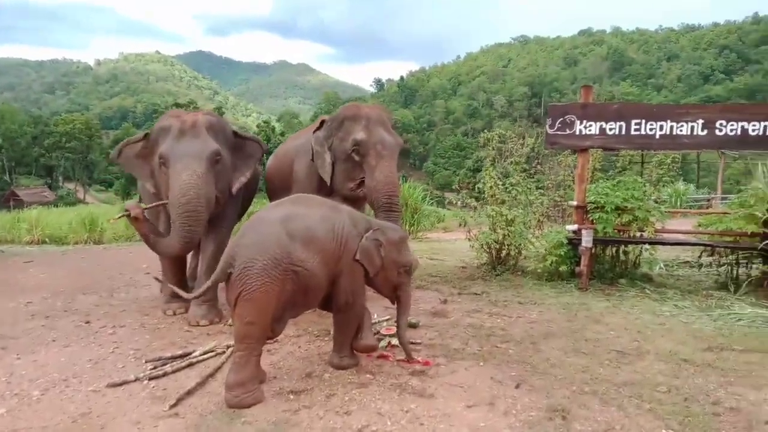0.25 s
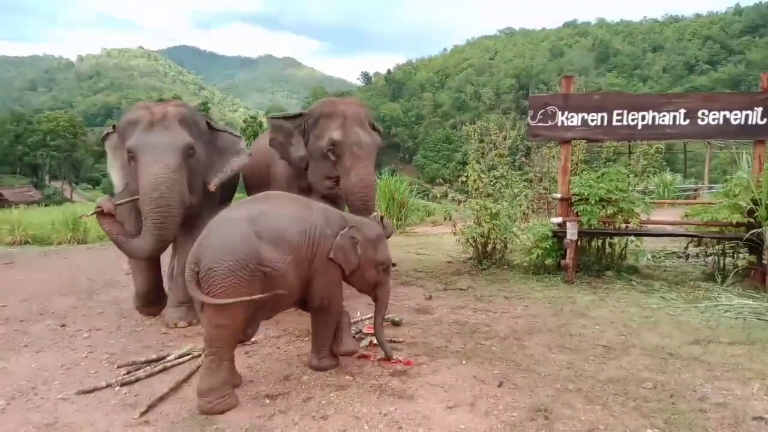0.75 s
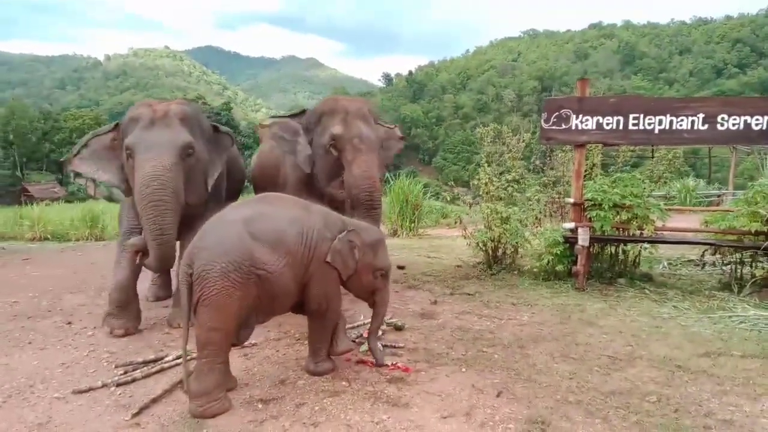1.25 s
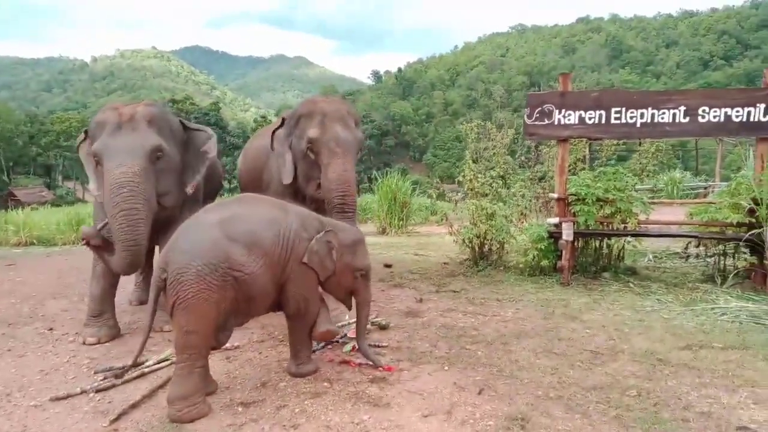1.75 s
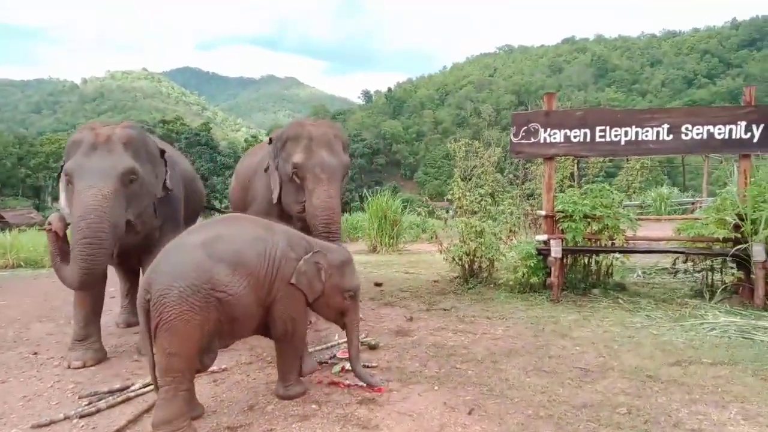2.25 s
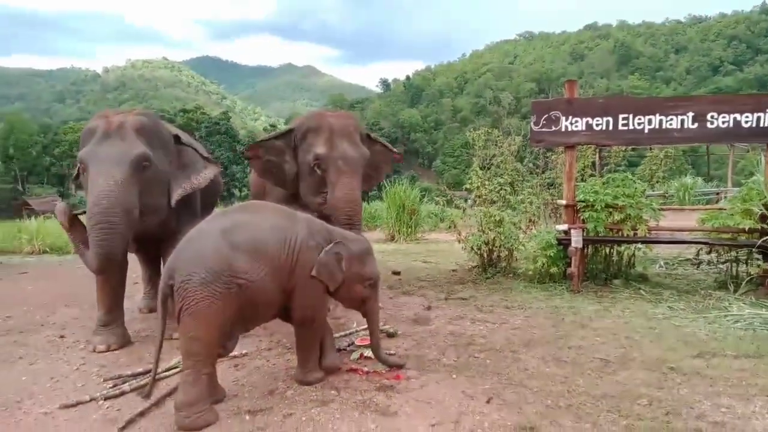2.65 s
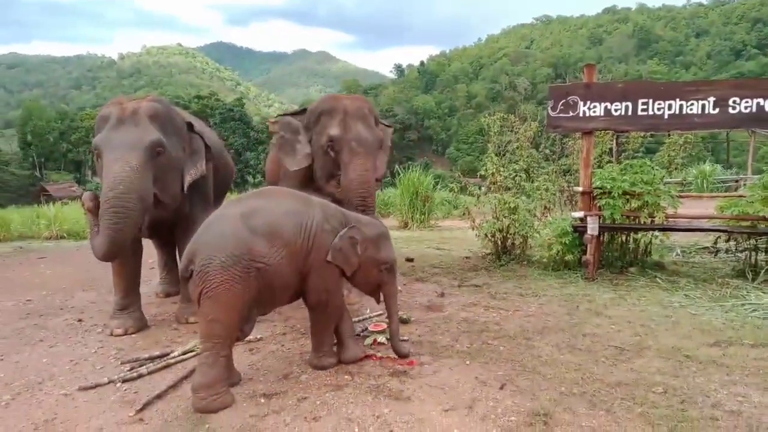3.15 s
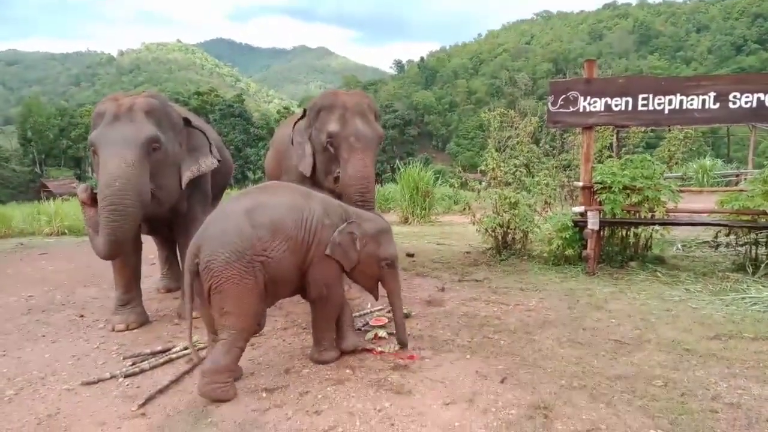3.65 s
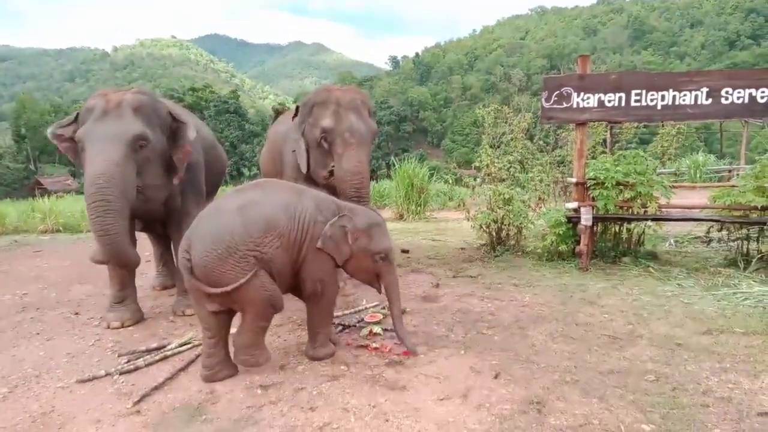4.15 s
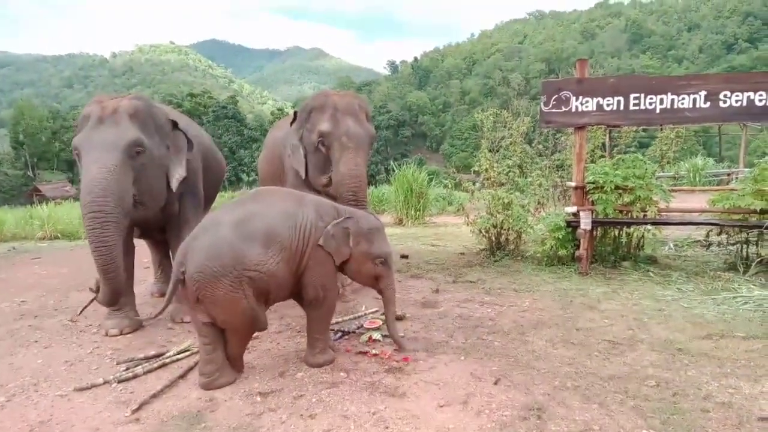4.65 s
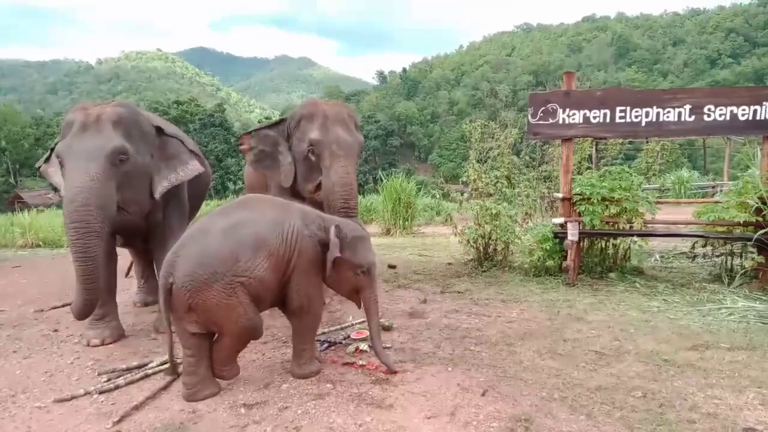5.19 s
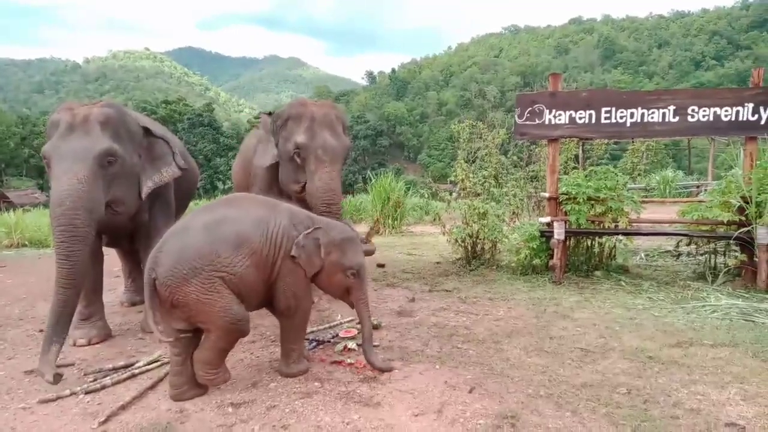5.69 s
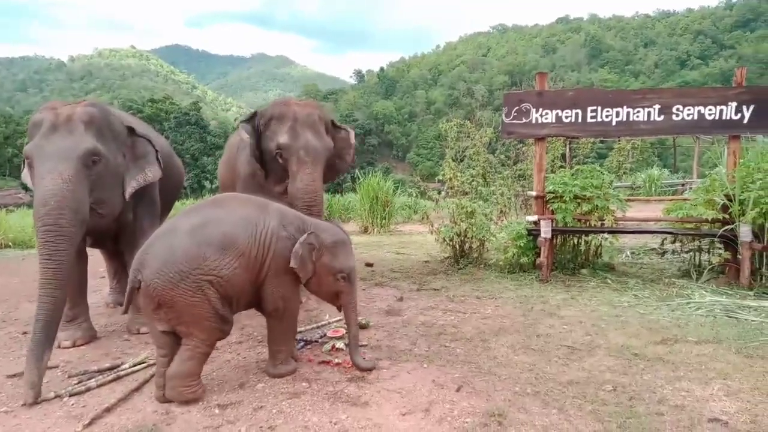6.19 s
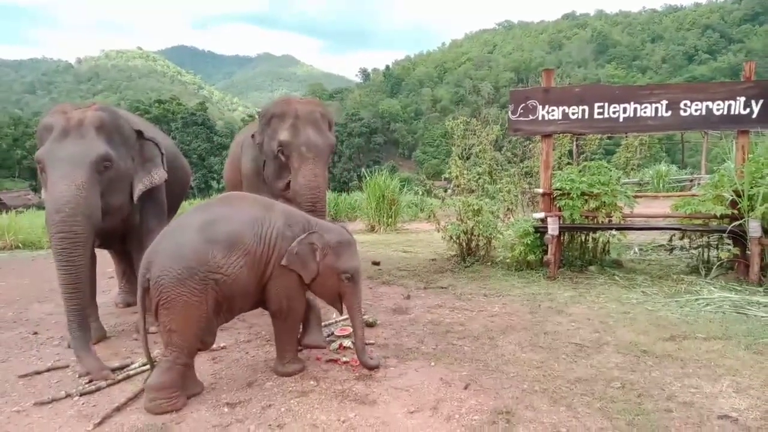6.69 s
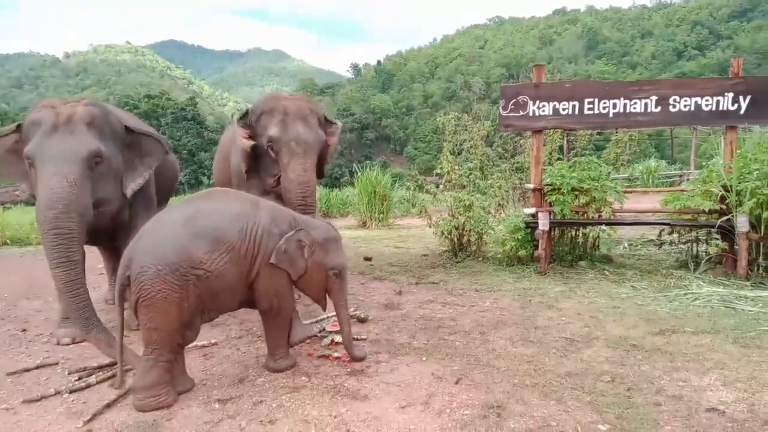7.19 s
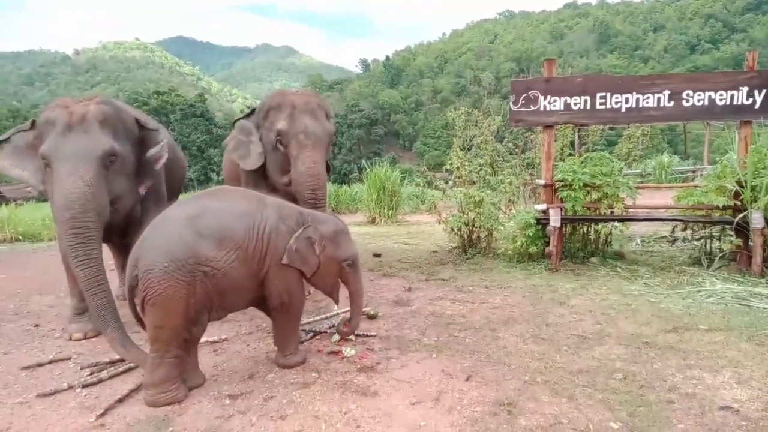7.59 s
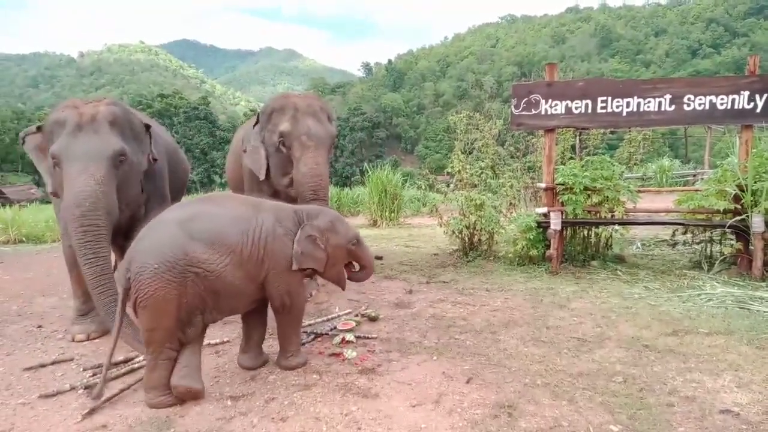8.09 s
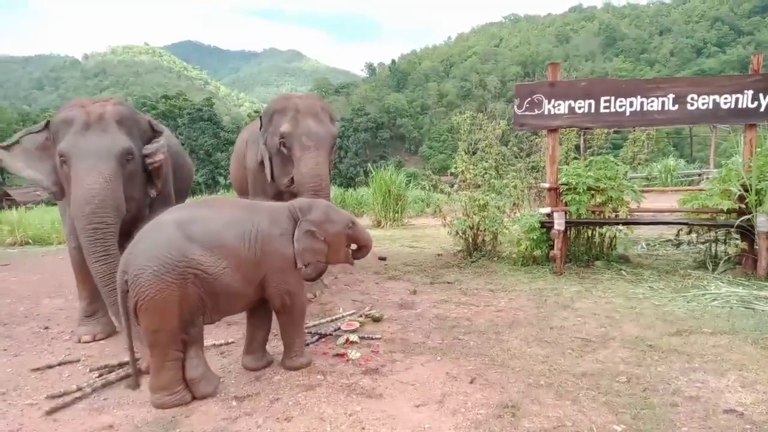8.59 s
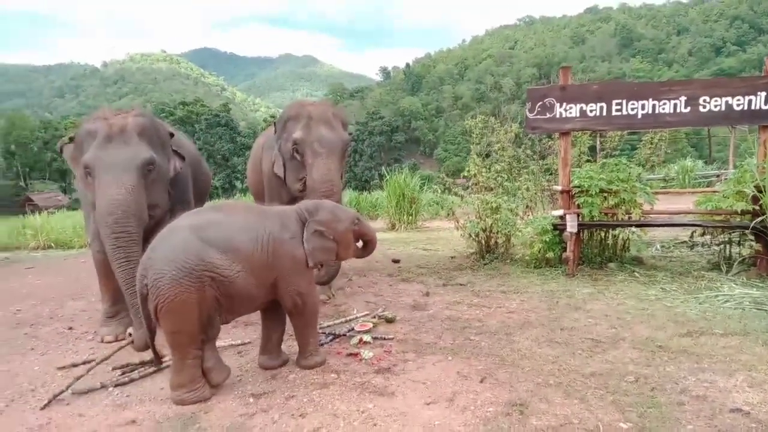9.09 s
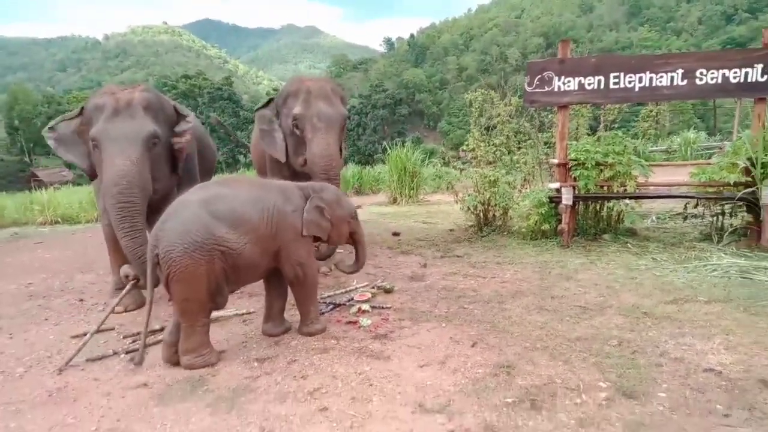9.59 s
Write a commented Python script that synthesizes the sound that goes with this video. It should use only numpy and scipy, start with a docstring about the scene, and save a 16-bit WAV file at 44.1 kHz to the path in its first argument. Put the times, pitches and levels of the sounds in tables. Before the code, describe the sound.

Elephants munch stalks and melon close by on open ground, fibres snapping, two loud hollow cane cracks, faint birds whistling over soft leafy hiss.

```python
"""Elephants feed close to the microphone on open ground among wooded hills: filtered noise throughout for
far foliage and low air, swept sines for a ticking insect, clumped grains for trunks and feet in the dirt.
Soon fibres snap, jaws munch and rind pops, as clicks, bursts and resonances; stalks crack loudly with ringing
cane modes at 1.2 s and 4 s. From 2.5 s birds whistle far off, as gliding sines; from 8.4 s the calf slowly
crushes melon, as dense muffled grains, and after 9 s two bird trills fall to a firm note."""
import sys
import numpy as np
from scipy import signal
from scipy.fft import rfft, irfft
from scipy.io import wavfile
from scipy.ndimage import uniform_filter1d

SR = 44100
rng = np.random.default_rng(int(sys.argv[2]) if len(sys.argv) > 2 else 0)


def waveform_to_disk(signal):
    """Save audio, clipped to [-1, 1], as 16-bit WAV at the path in sys.argv[1]."""
    frames = np.transpose(np.atleast_2d(signal))
    scaled = np.clip(frames, -1, 1) * 32767
    samples = np.round(scaled).astype(np.int16)
    wavfile.write(sys.argv[1], SR, samples)


N = 433944

# spectrum of breaking fibres: f/Hz, gain/dB
FIBRE_COLOUR = [(100, -57), (400, -15.5), (1100, 1.5), (2500, 7.5), (4400, 5.5), (5500, -3), (8400, -14.5),
                (9500, -31.5), (15500, -37)]
# spectrum of wet pulp and soft flesh: f/Hz, gain/dB
PULP_COLOUR = [(250, -18.5), (400, 4), (500, -0.5), (690, 6), (940, -0.5), (1250, 4.5), (1600, -3),
               (3000, -41)]


def gain_of(db):
    """Decibels to amplitude."""
    return 10 ** (np.asarray(db) / 20)


def evened(x):
    """Scales to rms 1."""
    return x / np.sqrt(np.mean(x ** 2) + 1e-20)


def peaked(x, size=130):
    """Scales a hit so that its loudest three milliseconds have an rms of 0.5."""
    return x / np.sqrt(4 * uniform_filter1d(x ** 2, size).max())


def read(points, hz):
    """Reads a spectrum on a log-frequency axis."""
    f, value = np.transpose(points)
    return np.interp(np.log(hz + 1), np.log(f + 1), value)


def level(curve):
    """A (t/s, level/dB) curve as a gain for every sample."""
    return gain_of(np.interp(np.arange(N) / SR, *np.transpose(curve)))


def add(mix, s, sound):
    """Adds a sound to the mix at time s."""
    part = mix[max(round(s * SR), 0):][:len(sound)]
    part += sound[:len(part)]


def coloured(x, colour, tilt_db=0, size=4096):
    """Minimum-phase filter with the given spectrum, tilted by dB per octave about 2 kHz."""
    hz = abs(np.fft.fftfreq(size, 1 / SR))
    octaves = np.log2(np.clip(hz, 300, 9000) / 2000)  # the tilt levels off outside 300-9000 Hz
    log_gain = np.log(gain_of(read(colour, hz) + tilt_db * octaves))
    response = np.exp(np.conj(signal.hilbert(log_gain)))
    taps = np.fft.ifft(response).real[:size // 2]
    return signal.oaconvolve(x, taps)[:len(x)]


def resonate(x, hz, width_hz):
    """One damped resonance."""
    r = np.exp(-np.pi * width_hz / SR)
    return signal.lfilter([1 - r], [1, -r * np.exp(2j * np.pi * hz / SR)], x).imag


def drift(per_s):
    """Slow random wander of rms 1, through per_s random points a second."""
    knots = rng.standard_normal(4096)
    return evened(np.interp(np.arange(N) / SR * per_s, np.arange(len(knots)), knots))


def grains(per_s, spread_db):
    """Random clicks, of either sign and scattered size."""
    size = gain_of(spread_db * np.minimum(rng.exponential(1, N), 4))
    sign = rng.choice([-1, 1], N)
    return evened(size * sign * (rng.random(N) < per_s / SR))


def burst(rise_s, t60, size=8192, order=90):
    """A dying volley of noise, for tiny fractures, with an evened spectrum; also returns its envelope."""
    t = np.arange(size) / SR
    shape = (1 - np.exp(-(t / rise_s) ** 2)) * gain_of(-60 * t / max(t60, .004))
    z = rfft(rng.standard_normal(size) * shape)
    volley = irfft(z / np.sqrt(uniform_filter1d(abs(z) ** 2, order)))
    return volley * signal.windows.tukey(size, .002), shape


def patchy(x, depth_db, span_s, span_hz, size=1024):
    """Lets patches of the spectrum swell and fade on their own, as the contact shifts."""
    hop = size // 4
    z = signal.stft(x, SR, nperseg=size, noverlap=size - hop)[2]
    field = rng.standard_normal(z.shape)
    for axis, cells in enumerate([span_hz * size / SR, span_s * SR / hop]):
        blur = signal.windows.gaussian(61, max(cells, .2) / 2)
        field = signal.fftconvolve(field, np.expand_dims(blur, 1 - axis), "same")
    z = z * gain_of(depth_db * evened(field))
    return evened(signal.istft(z, SR, nperseg=size, noverlap=size - hop)[1][:N])


def stroke(texture, s, length, attack_s, swell_db_per_s, release_db_per_s):
    """One stroke of a texture: pressure builds, slowly swells or eases while it holds, then lets go."""
    part = texture[round(s * SR):][:round((length + .5) * SR)]  # half a second for the release
    t = np.arange(len(part)) / SR
    fall_db = release_db_per_s * np.maximum(t - length, 0) - swell_db_per_s * t
    return part * np.minimum(t / attack_s, 1) * gain_of(-fall_db)


def clearing(x, near_db, far_db, near_t60=0.13):
    """Adds the place: quick scatter from ground and bodies, then a thin tail from the trees."""
    # decay of the tail: f/Hz, t60/s
    tail_t60 = [(200, 1), (1200, 0.47), (2200, 0.66), (3500, 0.96), (9000, 1)]
    t = np.arange(SR) / SR
    near, far = rng.standard_normal((2, SR)) * (1 - np.exp(-(t / 0.0013) ** 2))
    near = near * gain_of(-60 * t / near_t60)
    hz, at, z = signal.stft(far, SR, nperseg=256)
    decay = gain_of(-60 * at / read(tail_t60, hz)[:, None])
    far = signal.istft(z * decay, SR, nperseg=256)[1][:SR]
    echo = gain_of(near_db) * near / np.linalg.norm(near) + gain_of(far_db) * far / np.linalg.norm(far)
    return x + signal.fftconvolve(x, echo)[:N]


def hills(hills_db=-57, swell_db=0.77):
    """The even hiss of distant foliage: patchy filtered noise under a slight random swell."""
    # spectrum of the far foliage: f/Hz, gain/dB
    foliage_colour = [(30, -21), (70, -23), (200, -8), (400, -22), (640, -23), (810, -10), (990, -26.5),
                      (1150, -5), (1450, -13.5), (2100, -6.5), (4400, -11.5), (5600, -17.5), (8200, -21),
                      (9600, -35), (15500, -45)]
    noise = coloured(rng.standard_normal(N), foliage_colour)
    hiss = patchy(noise, depth_db=3.0, span_s=0.12, span_hz=150)
    return gain_of(hills_db + swell_db * drift(per_s=3.46)) * hiss


def breeze(trim_db=2, gust_db=4.0):
    """Light air brushing the microphone: lumpy low turbulence."""
    # strength of the air before the trim: t/s, level/dB
    air_level = [(0.0, -82.5), (0.82, -56.5), (1.09, -66), (1.56, -60), (1.92, -79), (2.33, -62),
                 (2.57, -76), (3.12, -75), (3.92, -60.5), (4.79, -66), (5.45, -59), (5.67, -62),
                 (5.81, -72), (7.15, -76), (8.6, -84), (9.84, -64)]
    # spectrum of the turbulence: f/Hz, gain/dB
    air_colour = [(20, -18), (45, -8), (75, 1), (120, -3.5), (180, -7), (350, -43), (900, -51)]
    air = evened(coloured(rng.standard_normal(N), air_colour))
    gusts = evened(air * gain_of(gust_db * drift(per_s=24)))
    return gain_of(trim_db) * level(air_level) * gusts


def insect(insect_db=-60, start_hz=7500, end_hz=7200):
    """A faint high chip, a short falling sine, nearly five times a second."""
    first_s, period_s, jitter_s = .032, .2124, 0.0058
    out, u = np.zeros(N), np.linspace(0, 1, SR // 40)
    hz = start_hz + (end_hz - start_hz) * u
    chip = np.sin(np.pi * u) * np.sin(2 * np.pi * np.cumsum(hz) / SR)
    for k, (late, db) in enumerate(rng.standard_normal((46, 2))):
        add(out, first_s + k * period_s + jitter_s * late, gain_of(insect_db + db) * chip)
    return out


def rustle(trim_db=-4.5, flutter_db=1.0, crackle_db=-7):
    """Trunks drag leaves and grit: dense dry grains with sparse sharp ticks among them, in patches."""
    # drags, level before trim and tilt: t/s, length/s, level/dB, tilt/(dB per octave)
    drags = [(0.036, 0.19, -45.5, -5.5), (0.18, 0.25, -52, -2.5), (0.395, 0.35, -59.5, -2.5),
             (0.692, 0.28, -51, -2), (0.998, 0.31, -50, 1), (1.26, 0.14, -42, 3.5),
             (1.498, 0.19, -42.5, 0.5), (1.713, 0.25, -46, -2), (1.968, 0.21, -43.5, 0),
             (2.302, 0.35, -49.5, -2), (2.734, 0.33, -53.5, 3), (3.143, 0.05, -44.5, -3.5),
             (3.679, 0.42, -52, 3), (4.653, 0.11, -41.5, 1), (4.932, 0.27, -49.5, 1.5),
             (5.19, 0.12, -46.5, 0), (5.3, 0.15, -42, 1), (5.468, 0.17, -52.5, 2.5), (5.85, 0.35, -52, -1),
             (6.376, 0.17, -53, 4), (6.656, 0.21, -51.5, -2.5), (6.88, 0.18, -54, -5.5),
             (7.045, 0.19, -55, 3), (7.263, 0.11, -48, -1), (7.37, 0.11, -45, -2.5), (7.51, 0.45, -54, 3),
             (8.01, .2, -52, 3.5), (8.343, 0.36, -49.5, 1.5), (8.714, 0.14, -44.5, -2),
             (8.904, 0.028, -45, -2), (9.064, 0.42, -53.5, 1), (9.526, 0.12, -47.5, -3),
             (9.685, 0.18, -43.5, -2.5)]
    # spectrum of dry litter: f/Hz, gain/dB
    litter_colour = [(400, -30.5), (900, -11.5), (1250, -2.5), (2300, 2.5), (4400, 2), (5400, -7),
                     (8300, -17.5), (9400, -29), (15500, -45)]
    # no colour, for the tilt alone: f/Hz, gain/dB
    flat = [(100, 0), (15000, 0)]
    grit = grains(per_s=5000, spread_db=-0.5) * gain_of(flutter_db * drift(per_s=79))
    ticks = grains(per_s=160, spread_db=2.5)
    dirt = coloured(grit + gain_of(crackle_db) * ticks, litter_colour)
    dirt = patchy(dirt, depth_db=2.5, span_s=0.018, span_hz=215)
    out = np.zeros(N)
    for s, length, db, tilt_db in drags:
        drag = stroke(dirt, s, length, attack_s=0.033, swell_db_per_s=10.5, release_db_per_s=94)
        add(out, s, gain_of(db + trim_db) * coloured(drag, flat, tilt_db))
    return out


def snaps(splinter_trim_db=-4, click_trim_db=-5, rise_s=0.001075):
    """Single fibres and twigs break: one sharp click in a brief splintering."""
    # small breaks, level before trims: t/s, level/dB, tilt/(dB per octave), t60/s
    breaks = [(0.157, -32.5, -1.5, 0.0099), (0.235, -36, -2.5, 0.042), (0.318, -36, -1, 0.013),
              (0.365, -37, -1.5, 0.03), (0.845, -33.5, -2, 0.013), (1.003, -34, -6.5, 0.034),
              (1.027, -23.5, 1.5, 0.035), (1.149, -23.5, 0, 0.068), (1.197, -26, -7.5, 0.12),
              (1.376, -24.5, 2, 0.063), (1.416, -26, 3, 0.015), (1.431, -27, 2, 0.055),
              (1.446, -23.5, -2, 0.034), (1.48, -37, -2, 0.015), (1.505, -33, 0, 0.025),
              (1.549, -31, 2, 0.025), (1.571, -30.5, 10, 0.025), (1.649, -27.5, -11, 0.045),
              (1.759, -32, -11.5, 0.0062), (3.496, -30, -8.5, 0.21), (3.518, -33.5, 1, 0.044),
              (3.7, -41.5, -3, 0.011), (3.844, -32, -4, 0.041), (4.046, -25, 6.5, 0.027),
              (4.079, -30.5, 11, 0.15), (4.104, -28, 7, 0.11), (4.132, -29, 10, 0.05),
              (4.146, -28, 0.5, 0.037), (4.546, -38, -3, 0.078), (5.203, -25, -0.5, 0.028),
              (5.242, -33, 0, 0.024), (5.283, -27, -2, 0.016), (5.36, -33, 10, 0.027),
              (5.424, -25.5, 5, 0.03), (5.445, -29, -1.5, 0.016), (5.561, -33, -9, 0.015),
              (5.729, -36, 11, 0.032), (5.81, -26, -4.5, 0.051), (6.488, -37, 0, 0.02),
              (6.874, -35, -9, 0.035), (7.958, -22.5, 1.5, 0.0086), (8.071, -34, -3.5, 0.062),
              (8.307, -35.5, -3, 0.14), (8.404, -34.5, 11, 0.098), (8.514, -27.5, 3.5, 0.075),
              (8.909, -32.5, -4, 0.16), (9.311, -33, -1.5, 0.0047), (9.552, -30.5, -9, 0.022),
              (9.638, -34, -4, 0.022), (9.669, -40, -3, 0.02), (9.689, -33, -3, 0.029)]
    out = np.zeros(N)
    for s, db, tilt_db, t60 in breaks:
        splinters = peaked(coloured(burst(rise_s, t60)[0], FIBRE_COLOUR, tilt_db))
        click = coloured(signal.unit_impulse(len(splinters)), FIBRE_COLOUR, tilt_db)
        add(out, s, gain_of(db + splinter_trim_db) * splinters)
        add(out, s + rise_s, gain_of(db + click_trim_db) * 2 * click / abs(click).max())
    return out


def tears():
    """The fibres of a strained or split stalk part one by one, in separate ticks."""
    # spells of parting: t/s, length/s, level/dB
    partings = [(0.2, 0.172, -52), (1.12, 0.023, -45.5), (1.285, 0.18, -51), (1.47, 0.23, -55.5),
                (4.027, 0.13, -47)]
    out, ticks = np.zeros(N), evened(coloured(grains(per_s=70, spread_db=2), FIBRE_COLOUR))
    for s, length, db in partings:
        parting = stroke(ticks, s, length, attack_s=.005, swell_db_per_s=0, release_db_per_s=400)
        add(out, s, gain_of(db) * parting)
    return out


def munch(attack_s=0.04, swell_db_per_s=-8, release_db_per_s=170):
    """Each stroke of the jaws bursts pulp in a mouth whose hollows keep changing shape."""
    # jaw strokes, muffled grinding and wet squelching: t/s, length/s, grind level/dB, squelch level/dB
    jaw_strokes = [(0.382, 0.072, -57.5, -59.5), (0.685, 0.29, -61.5, -57), (1.02, 0.23, -50.5, -51),
                   (1.31, 0.19, -52, -47.5), (1.523, 0.27, -52.5, -48.5), (1.813, 0.3, -58.5, -47.5),
                   (2.152, 0.17, -60, -63), (2.402, 0.11, -54.5, -75), (2.636, 0.37, -70, -60.5),
                   (3.457, 0.42, -59, -70), (3.987, 0.32, -60, -54.5), (4.35, 0.17, -67.5, -71),
                   (5.25, 0.34, -67, -57), (5.515, 0.29, -63, -60), (5.78, 0.25, -58.5, -57.5),
                   (6.505, 0.26, -67.5, -70), (6.845, 0.042, -48.5, -47.5), (6.936, 0.18, -65, -67),
                   (7.196, 0.29, -68.5, -60), (7.533, 0.15, -57, -59.5), (7.918, 0.11, -49, -52),
                   (8.308, 0.35, -60.5, -85), (9.497, 0.086, -56, -54)]
    # spectrum of muffled grinding: f/Hz, gain/dB
    grind_colour = [(70, -23), (130, -2.5), (190, 0.5), (310, -0.5), (400, -8.5), (600, -41), (1200, -45)]
    cells = grains(per_s=2000, spread_db=2.5)
    grind = patchy(coloured(cells, grind_colour), depth_db=3.0, span_s=0.029, span_hz=79)
    wet_cells = grains(per_s=2200, spread_db=3.0)
    squelch = patchy(coloured(wet_cells, PULP_COLOUR), depth_db=2.5, span_s=0.035, span_hz=150)
    out = np.zeros(N)
    for s, length, muffled_db, wet_db in jaw_strokes:
        pulp = gain_of(muffled_db) * grind + gain_of(wet_db) * squelch
        add(out, s, stroke(pulp, s, length, attack_s, swell_db_per_s, release_db_per_s))
    return out


def thuds(trim_db=-1, swell_s=0.0094, delay_s=0.0032):
    """Soft low thuds: a few cycles of a sine that swell and die away."""
    # thuds, start before the delay and level before trim: t/s, level/dB, f/Hz
    low_hits = [(0.431, -47, 83.4), (1.004, -47, 67.3), (1.59, -49, 77), (1.712, -44, 115),
                (2.113, -38, 99), (2.151, -41, 60.4), (3.289, -48, 71), (3.827, -45.5, 89.5),
                (4.35, -51, 84), (4.48, -47, 65.6), (4.72, -38.5, 85.5), (4.943, -45, 109), (5.19, -39, 88),
                (5.306, -42, 63.3), (5.491, -41, 79.6), (5.549, -40, 99), (5.802, -48, 121),
                (9.21, -44, 55)]
    out, t = np.zeros(N), np.arange(SR // 4) / SR
    shape = t / swell_s * np.exp(1 - t / swell_s)
    for s, db, hz in low_hits:
        add(out, s + delay_s, gain_of(db + trim_db) * shape * np.sin(2 * np.pi * hz * t))
    return out


def pops(trim_db=-2, low_width_hz=180, high_width_hz=210, lead_s=0.00309):
    """Rind gives way in a hollow mouth: short tearing bursts sound its two resonances."""
    # pops, starting lead_s early, level before trim: t/s, level/dB, low f/Hz, high f/Hz, high against low/dB
    hollows = [(0.844, -40.5, 654, 1100, 17), (1.758, -32, 686, 1220, 8), (1.785, -37, 690, 1180, 7),
               (1.863, -38, 665, 1250, 8), (1.892, -34.5, 644, 1390, -1), (3.791, -38, 814, 1170, -6),
               (5.205, -45, 810, 1340, -22), (5.243, -44.5, 770, 1540, -23), (5.281, -45, 714, 1590, -16),
               (5.312, -44, 710, 1380, -4), (5.36, -43, 690, 1560, -17), (5.516, -48, 650, 1350, -19),
               (5.564, -30.5, 504, 1400, -10), (5.614, -32, 520, 1420, 3), (5.649, -26, 507, 1360, 3.5),
               (5.699, -36, 455, 1480, 2), (5.735, -25.5, 480, 1340, 5), (7.27, -45, 630, 1180, -10),
               (7.448, -36.5, 626, 1660, -3.5), (7.558, -35, 470, 1370, -4.5),
               (7.901, -33.5, 664, 1090, -1.5), (7.96, -31.5, 663, 1280, -10), (7.992, -42, 716, 1040, 8),
               (8.03, -37.5, 693, 1090, -10), (8.174, -40.5, 775, 1203, -1), (9.784, -40.5, 565, 1320, -5)]
    out = np.zeros(N)
    for s, db, low_hz, high_hz, high_db in hollows:
        tear = burst(rise_s=0.0021, t60=0.049, order=30)[0]
        low = peaked(resonate(resonate(tear, low_hz, low_width_hz), low_hz, low_width_hz))
        high = peaked(resonate(resonate(tear, high_hz, high_width_hz), high_hz, high_width_hz))
        pop = gain_of(-high_db / 2) * low + gain_of(high_db / 2) * high
        add(out, s - lead_s, gain_of(db + trim_db) * pop)
    return out


def knocks(crush_db=-18, rise_s=0.0024, bend=0.13):
    """Jaws and fruit: a damped low note sags as the pressure eases, with soft flesh crushed around it."""
    # dull knocks, f midway through the sag: t/s, level/dB, f/Hz, t60/s
    dull_hits = [(1.056, -39.5, 299, 0.17), (1.165, -35.5, 323, 0.076), (1.246, -25, 360, 0.081),
                 (1.66, -25, 295, 0.039), (3.102, -29.5, 325, 0.043), (3.496, -32.5, 304, 0.052),
                 (3.519, -28.5, 288, 0.065), (4.754, -40, 186, 0.04), (5.811, -40.5, 224, 0.15),
                 (5.963, -45, 330, 0.08), (6.489, -28.5, 315, 0.028), (6.873, -32.5, 304, 0.07),
                 (6.985, -43.5, 323, 0.12), (7.104, -50.5, 294, 0.11), (7.892, -39, 161, 0.095),
                 (7.954, -36, 186, 0.03), (8.028, -40.5, 277, 0.14), (8.071, -41, 286, 0.062),
                 (9.232, -43, 163, 0.046)]
    out = np.zeros(N)
    for s, db, hz, t60 in dull_hits:
        volley, shape = burst(rise_s, t60)
        t = np.arange(len(shape)) / SR
        sagging_hz = hz * (1 + bend * (np.exp(-t / 0.028) - .5))
        note = shape / shape.max() * np.sin(2 * np.pi * np.cumsum(sagging_hz) / SR)
        crush = peaked(coloured(volley, PULP_COLOUR))
        add(out, s, gain_of(db) * (note + gain_of(crush_db) * crush))
    return out


def cracks(crack_trim_db=-2, hollow_trim_db=2, wall_trim_db=-2, rise_s=0.0035, splinter_width_hz=400,
           lead_s=0.00098):
    """Each split is a volley of tearing fibres that shakes the splinter and rings the hollow cane."""
    # splits, levels before trims; the f is the splinter's:
    # t/s, level/dB, hollow ring level/dB, f/Hz, tilt/(dB per octave), t60/s, splinter ring level/dB
    splits = [(1.2425, -2, -19, 2060, -1.5, 0.0076, 9), (1.248, -7.5, -47, 1440, -5, 0.0078, 18),
              (1.2612, -12.5, -52, 2670, 3, 0.02, 8), (1.273, -12.5, -51, 2230, 5.5, 0.02, 13),
              (1.3164, -23, -60, 2130, 7, 0.015, 16), (1.4, -17.5, -43, 2110, -2.5, 0.013, 6),
              (3.969, -10, -15, 2870, 1.5, 0.054, 5), (3.9796, -17.5, -21, 2880, -4, 0.039, 6),
              (3.997, -3, -36, 2700, 0.5, 0.024, -4), (4.0097, -16, -46, 2740, 7.5, 0.03, -5),
              (4.2061, -15, -31, 2560, -3, 0.026, 10), (4.2233, -9.5, -21, 2520, -2, 0.023, 7)]
    # cane modes, the air inside first and then the wall: f/Hz, level/dB, t60/s
    cane_modes = [(447, -7, 0.019), (1050, -10, 0.046), (1161, 1.5, 0.074), (1430, -38, 0.04),
                  (1786, -9, 0.028), (2450, -35, 0.054), (2690, -14, 0.043), (3130, -27, 0.046),
                  (3820, -14, 0.045), (4200, -16, 0.044), (4710, -26, 0.06)]
    # spectrum of the tearing volley: f/Hz, gain/dB
    volley_colour = [(100, -17), (330, -6.5), (460, 0), (830, 0), (1100, 9), (1600, 1), (2600, 6),
                     (3400, 5), (4400, 6), (5400, -4.5), (8400, -13), (9500, -25.5), (15500, -36)]
    out, t = np.zeros(N), np.arange(SR // 4) / SR
    for s, db, hollow_db, splinter_hz, tilt_db, t60, splinter_db in splits:
        volley = coloured(burst(rise_s, t60)[0], volley_colour, tilt_db)
        splinter = signal.lfilter(*signal.iirpeak(splinter_hz, splinter_hz / splinter_width_hz, SR), volley)
        crack = peaked(volley + gain_of(splinter_db) * splinter)
        add(out, s - lead_s, gain_of(db + crack_trim_db) * crack)
        for hz, mode_db, life in cane_modes:
            if hz < 1500:  # air inside the cane
                drive_db = hollow_db + hollow_trim_db
            else:  # its wall
                drive_db = db + wall_trim_db + tilt_db * np.log2(hz / splinter_hz)
            # phase runs on one clock, so a further split feeds the ring already going
            ring = np.sin(2 * np.pi * hz * (t + round(s * SR) / SR))
            fade = gain_of(drive_db + mode_db - 60 * t / life)
            add(out, s, fade * ring * (1 - np.exp(-t / rise_s)))
    return out


def rubs():
    """Hide, stalks and pulp rub: quick slips sound one resonance, a scuff if broad, a creak if narrow."""
    # rubs, width of each of two passes: t/s, length/s, level/dB, f/Hz, width/Hz
    contacts = [(1.3, 0.033, -40, 2130, 130), (1.654, 0.19, -47, 1205, 248), (3.136, 0.11, -47, 3850, 900),
                (3.161, 0.16, -58.5, 680, 280), (3.55, 0.36, -57.5, 160, 40), (3.599, 0.11, -63, 320, 110),
                (4.058, 0.14, -49, 413, 100), (4.269, 0.044, -46.5, 428, 80), (5.249, 0.27, -52.5, 687, 70),
                (5.5, 0.35, -53.5, 640, 220), (5.577, 0.18, -49.5, 1393, 170),
                (6.384, 0.18, -56, 2720, 650), (7.167, 0.091, -60, 700, 70), (7.274, 0.27, -54.5, 620, 260),
                (8.393, 0.044, -44.5, 2050, 200)]
    out = np.zeros(N)
    for s, length, db, hz, width_hz in contacts:
        slips = rng.laplace(size=SR // 2)[:round(length * SR)]
        body = evened(resonate(resonate(slips, hz, width_hz), hz, width_hz))
        add(out, s, gain_of(db) * body * signal.windows.tukey(len(body), .7))
    return out


def dust(trim_db=-1):
    """Fine dust slides under trunk and feet: the thin hiss of the finest grains."""
    # slides, level before trim: t/s, length/s, level/dB
    slides = [(2.303, 0.4, -62.5), (2.975, 0.19, -66), (4.677, 0.18, -61.5), (5.3, 0.28, -58.5),
              (6.016, 0.34, -59.5), (7.26, 0.13, -59.5), (8.017, 0.87, -60), (9.496, 0.29, -60.5)]
    # spectrum of the finest grains: f/Hz, gain/dB
    fine_colour = [(1500, -18), (5000, 13), (8300, 6.5), (9600, -4), (15500, -13)]
    out, hiss = np.zeros(N), evened(coloured(grains(per_s=4600, spread_db=3.5), fine_colour))
    for s, length, db in slides:
        slide = stroke(hiss, s, length, attack_s=0.025, swell_db_per_s=-1.0, release_db_per_s=112)
        add(out, s, gain_of(db + trim_db) * slide)
    return out


def whistle(length, start_hz, middle_hz, end_hz, loudest, trill=0, trill_hz=72, fade_db=24):
    """One thin, wavering note swells to its loudest place and fades; a trill narrows as the note settles."""
    u = np.linspace(0, 1, round(length * SR))
    turn, depth = 2 * np.pi * trill_hz * length * u, trill * np.cos(np.pi * u / 2)
    glide_hz = np.polyval(np.polyfit([0, .5, 1], [start_hz, middle_hz, end_hz], 2), u)
    hz = glide_hz * (1 + depth * np.sin(turn))
    pulsing_db = 55 * depth * (np.sin(turn - .7) - .7)  # loudest just past the top of each arch
    waver_db = 2.2 * np.interp(130 * length * u, np.arange(32), rng.standard_normal(32))
    shape = gain_of(pulsing_db + waver_db - fade_db * (u - loudest) ** 2) * signal.windows.tukey(len(u), .2)
    return shape * np.sin(2 * np.pi * np.cumsum(hz) / SR)


def birds(trim_db=-4.0, trill=.13, trill_fade_db=10):
    """Far-off whistles, most sliding down, then two trills that start faint and end firm."""
    # whistles, level before trim, loudest place as a share of the length:
    # t/s, length/s, start f/Hz, middle f/Hz, end f/Hz, level/dB, loudest place
    single_notes = [(2.54, 0.038, 5660, 4800, 4330, -51, .6), (2.592, 0.15, 4315, 4160, 4165, -41.5, 0.46),
                    (3.255, 0.032, 2800, 2680, 2360, -39, 0.59),
                    (3.379, 0.051, 5700, 4330, 3310, -44.5, 0.76),
                    (3.598, 0.052, 4070, 3790, 3120, -39, 0.51),
                    (3.817, 0.095, 3030, 3200, 3380, -36.5, 0.7),
                    (4.418, 0.019, 2810, 2620, 2300, -42.5, 0.37),
                    (4.458, 0.052, 5900, 4670, 3100, -42.5, 0.95),
                    (4.646, 0.049, 3930, 3020, 2380, -38, 0.46),
                    (5.052, 0.054, 3590, 3140, 2310, -36, 0.41),
                    (5.308, 0.078, 4440, 3650, 2350, -35.5, 0.46),
                    (7.38, 0.067, 5800, 4280, 3400, -46, 0.67), (8.775, 0.033, 3180, 2750, 2470, -37, 0.74)]
    # trills, level before trim: t/s, length/s, start f/Hz, middle f/Hz, end f/Hz, level/dB
    trilled_notes = [(9.16, 0.099, 3750, 3110, 2500, -34), (9.426, 0.085, 3950, 3120, 2420, -35)]
    out = np.zeros(N)
    for s, length, start_hz, middle_hz, end_hz, db, loudest in single_notes:
        note = whistle(length, start_hz, middle_hz, end_hz, loudest)
        add(out, s, gain_of(db + trim_db) * note)
    for s, length, start_hz, middle_hz, end_hz, db in trilled_notes:
        note = whistle(length, start_hz, middle_hz, end_hz, 1, trill, fade_db=trill_fade_db)
        add(out, s, gain_of(db + trim_db) * note)
    return out


def mouthful():
    """The calf slowly crushes melon: countless small cells of soft pulp burst in one muffled swell."""
    # strength of the crushing: t/s, level/dB
    crush_level = [(8.38, -74), (8.59, -47.5), (8.655, -41), (8.75, -45.5), (8.83, -41), (8.95, -45.5),
                   (9.02, -48.5), (9.19, -54), (9.24, -47.5), (9.34, -54), (9.5, -57)]
    # spectrum of the melon in the closed mouth: f/Hz, gain/dB
    melon_colour = [(60, -20), (150, 0), (300, 2), (390, -4.5), (490, -0.5), (600, -7.5), (850, -4),
                    (1250, -11.5), (1700, -20), (3500, -46.5)]
    t = np.arange(N) / SR
    pulp = evened(coloured(grains(per_s=6000, spread_db=2), melon_colour))
    return pulp * level(crush_level) * (t > crush_level[0][0]) * (t < crush_level[-1][0])


def scene():
    """Feeding sounds near the microphone and birds far off in the clearing, over the outdoor background."""
    background = hills() + breeze() + insect()
    ground = rustle() + thuds() + rubs() + dust()
    feeding = clearing(snaps() + tears() + pops() + knocks() + cracks(), near_db=-9.5, far_db=-16.0)
    chewing = munch() + mouthful()
    song = clearing(birds(), near_db=-7, far_db=-11)
    return (background + ground + feeding + chewing + song)[None]


def record(dry):
    """The recorder's low cut and band limit."""
    low_cut_hz, band_limit_hz = 46, 15900
    low_cut = signal.butter(2, low_cut_hz, "highpass", fs=SR, output="sos")
    band_limit = signal.firwin(511, band_limit_hz, window=("kaiser", 9), fs=SR)
    return signal.oaconvolve(signal.sosfilt(low_cut, dry), band_limit[None], "same")


dry = scene()
out = record(dry)
waveform_to_disk(out)
```